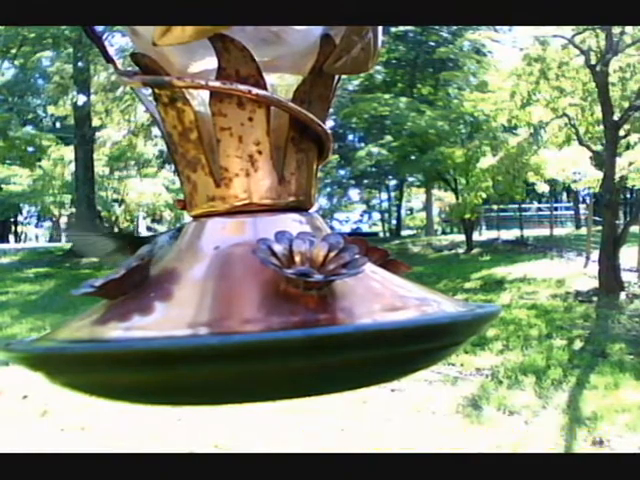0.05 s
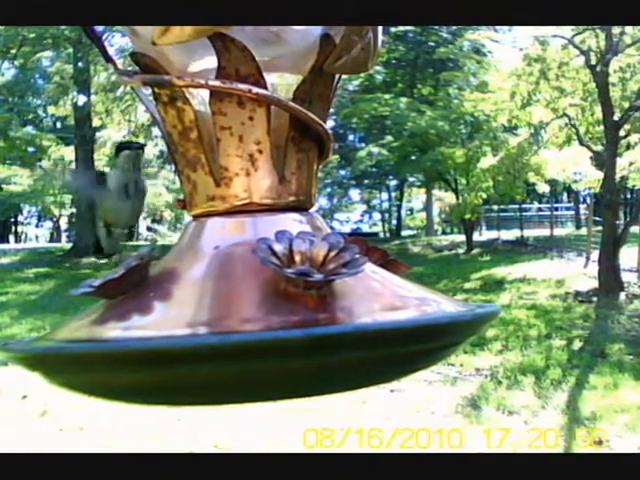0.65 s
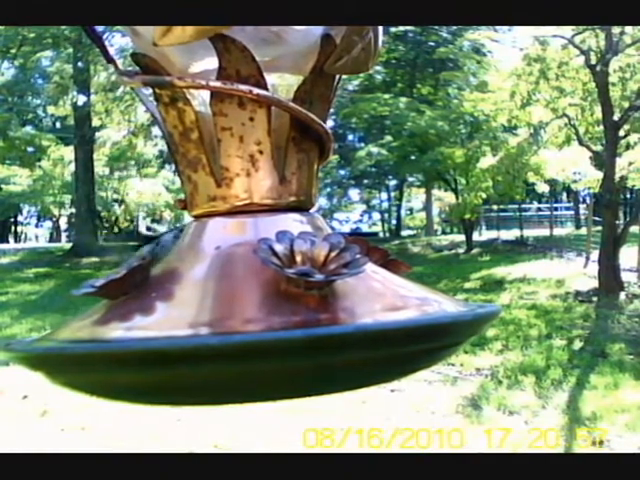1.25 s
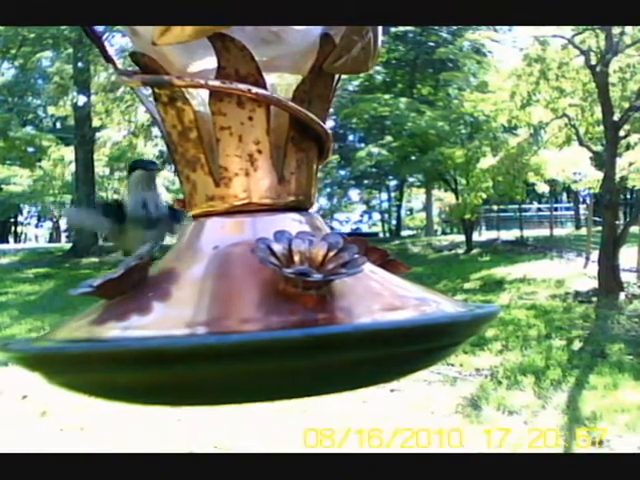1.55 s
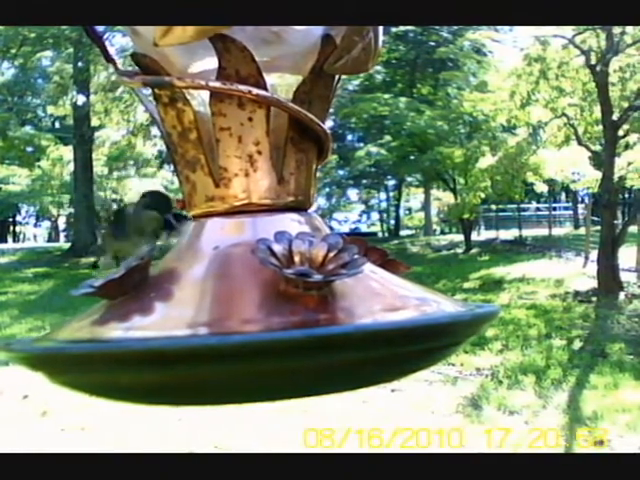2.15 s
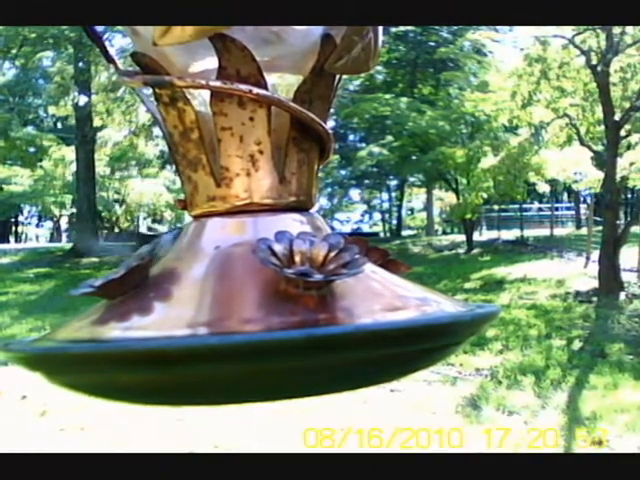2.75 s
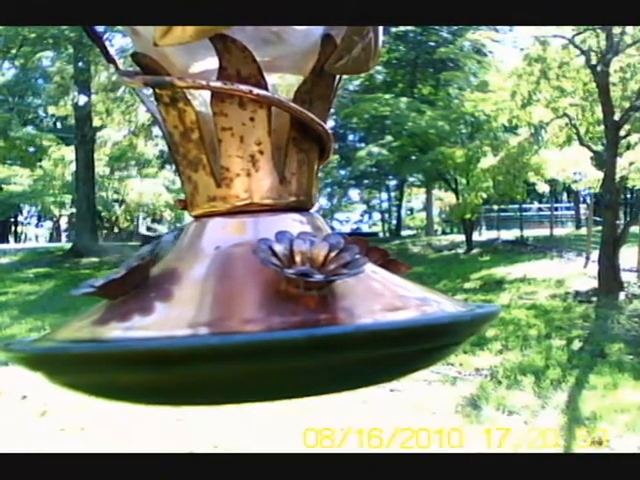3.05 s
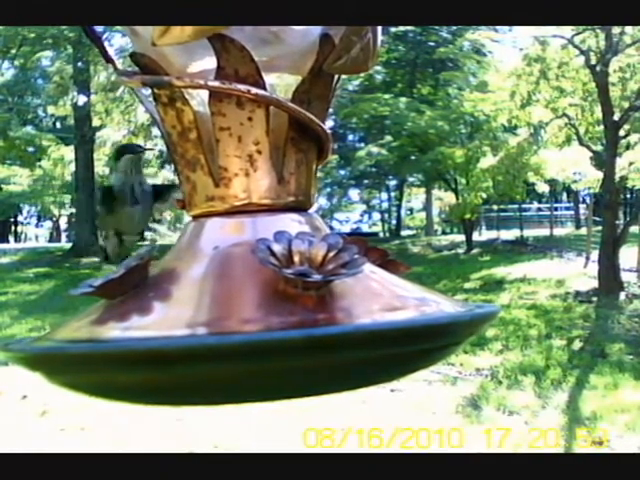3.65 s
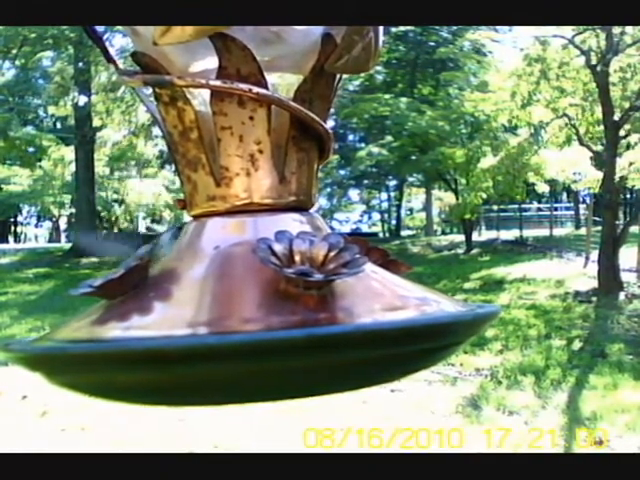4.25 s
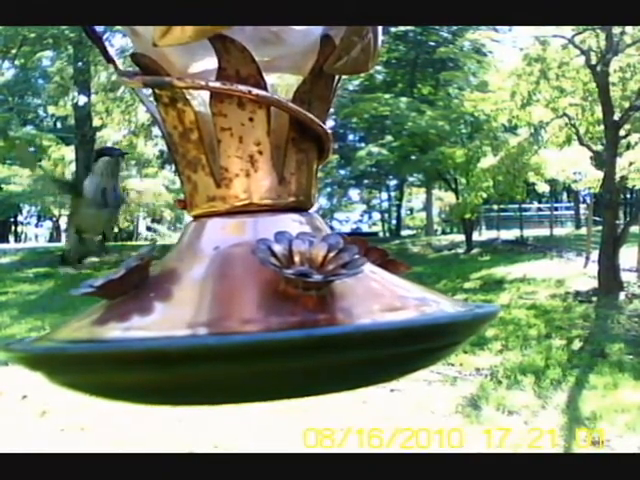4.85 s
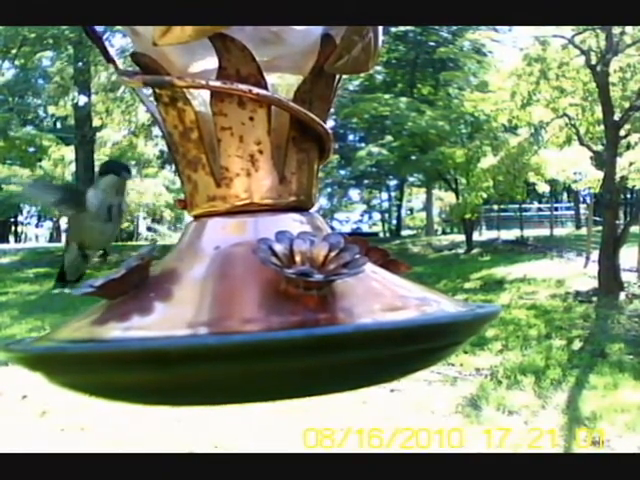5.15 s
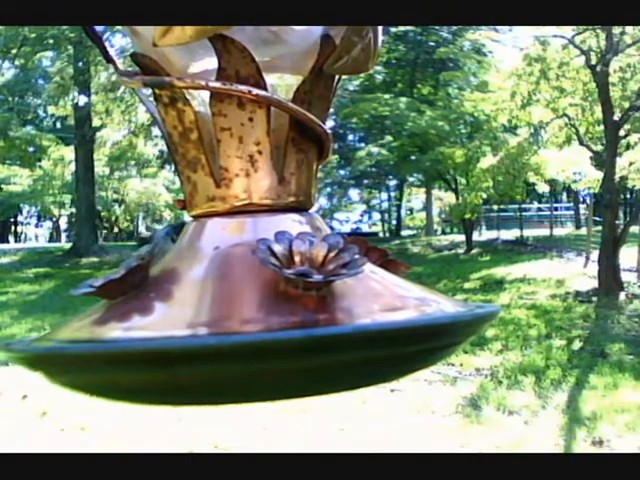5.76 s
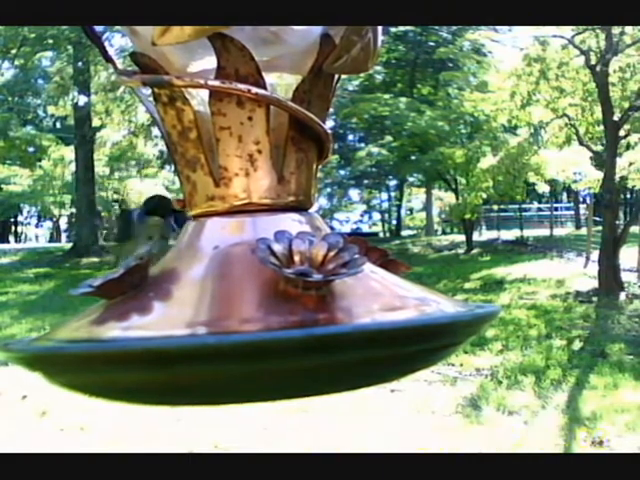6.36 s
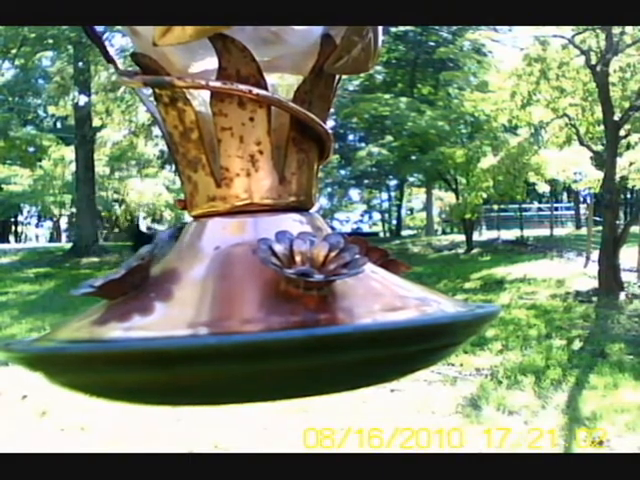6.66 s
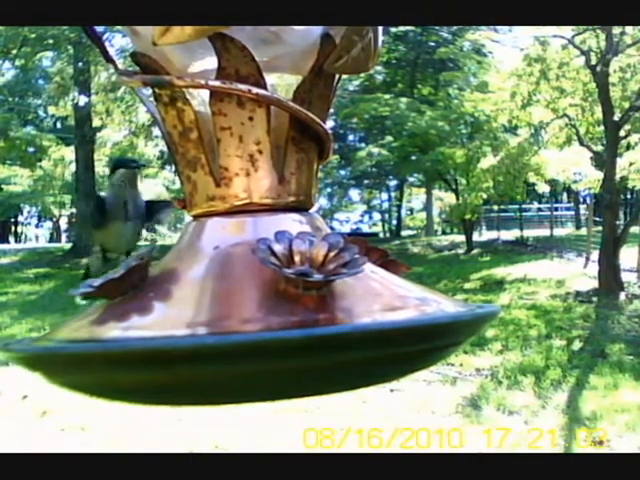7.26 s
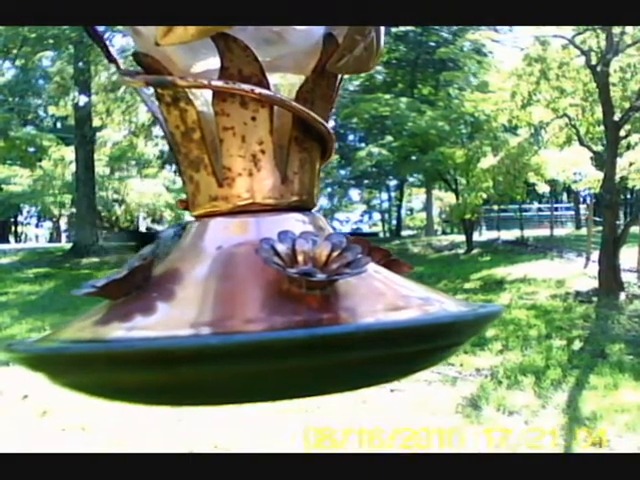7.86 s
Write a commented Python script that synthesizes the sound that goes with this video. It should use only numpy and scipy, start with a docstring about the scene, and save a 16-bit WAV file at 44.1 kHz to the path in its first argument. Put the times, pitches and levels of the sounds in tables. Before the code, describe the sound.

A hummingbird's wings hum low and swell as it darts at a feeder, with light taps over soft outdoor rumble and hiss.

```python
"""A hummingbird hovers at a feeder in a quiet yard, backing out between sips and darting in again.
Its wings throb about fifty times a second, each beat a swell of air, a snap and a feathery swish.
It squeaks twice, and small taps and brushes ring the hollow feeder. Far birds whistle among trees
and an insect's scraped trill creeps in, over a bed of low rumble, soft leaves and the hiss and
whine of a small camera beside the feeder."""
import sys
import numpy as np
from scipy import signal
from scipy.fft import rfft, irfft
from scipy.io import wavfile

SR = 44100
rng = np.random.default_rng(int(sys.argv[2]) if len(sys.argv) > 2 else 0)


def digitize_waveform(pressure):
    """Quantize a signal to 16-bit integers and store it at the path in sys.argv[1].

    Rows of a 2-D input are taken as channels; values are limited to [-1, 1].
    """
    field = np.atleast_2d(pressure).T
    bounded = np.clip(field, -1, 1)
    quanta = np.round(bounded * 32767).astype(np.int16)
    wavfile.write(sys.argv[1], SR, quanta)


N = 348831
TIME = np.arange(N) / SR

# Tone of the wing snap, coloured by the hollow feeder: (frequency [Hz], level [dB])
SNAP_SPECTRUM = [(50, 0.5), (100, -7), (150, -2), (195, -6.5), (245, -3.5), (295, -12), (390, -12.5),
                 (500, -20), (650, -30.5), (1000, -36)]
# The bird backs out with a few hard beats: (time [s], effort above hovering [dB])
RETREAT_BURSTS = [(0.055, 12.5), (1.366, 13), (3.03, 12.5), (4.536, 12.5), (5.683, 13.5), (6.741, 11)]
# It darts in again, more gently: (time [s], effort above hovering [dB], swell time [s])
DART_SWELLS = [(0.739, 7.5, 0.074), (2.17, 6.5, 0.071), (3.99, 6.5, 0.079), (5.17, 6, .06),
               (6.34, 6.5, .09), (7.155, 8, .035), (7.549, 7.5, .06)]
# Its thin squeaks: (time [s], length [s], start pitch [Hz], end pitch [Hz], level [dB])
BIRD_SQUEAKS = [(4.116, 0.02, 7650, 7600, -57), (4.42, .022, 7670, 7650, -52.5)]
# Taps and brushes on the feeder: (time [s], peak level [dB], brightness [Hz], 60 dB decay time [s])
FEEDER_TAPS = [(0.041, -46.5, 2100, 0.19), (0.582, -43, 2400, 0.02), (.764, -43.5, 1500, 0.022),
               (1.124, -44, 3200, .012), (1.846, -42.5, 450, 0.045), (3.601, -43.5, 6000, 0.093),
               (3.625, -46.5, 3500, 0.054), (3.7727, -40, 4400, 0.0097), (4.025, -47, 1800, 0.049),
               (4.044, -41.5, 750, .04), (4.1, -39, 744, 0.016), (4.122, -47, 1000, 0.018),
               (4.174, -42.5, 1699, 0.01), (4.4588, -32, 1660, 0.014), (7.047, -44.5, 6310, 0.022),
               (7.363, -46, 1900, 0.021)]
# The feeder's resonances: (frequency [Hz], width [Hz], relative level [dB])
FEEDER_MODES = [(465, 210, 20.5), (840, 210, 5), (1430, 300, 3.5), (1940, 510, 4), (3480, 1500, -0.5),
                (6040, 1300, -2), (8400, 2200, -5.5)]
# Far birds' whistles: (time [s], length [s], start pitch [Hz], end pitch [Hz], level [dB])
FAR_WHISTLES = [(.14, 0.21, 2400, 2770, -71), (2.42, 0.043, 1850, 1760, -65.5),
                (3.06, .04, 2040, 2070, -68), (3.18, 0.039, 2080, 1990, -64),
                (3.18, 0.079, 2450, 2640, -70), (3.405, 0.047, 2260, 2230, -64),
                (3.46, 0.037, 2010, 2000, -64), (4.07, 0.062, 1880, 1810, -67),
                (6.06, 0.064, 2280, 2525, -64.5), (6.47, .1, 2310, 2652, -65.5),
                (7.645, 0.058, 3020, 3583, -63.5)]
# Fade curve of the insect's trill: (time [s], level [dB])
TRILL_FADE = [(0, -75), (3, -82), (4.3, -73.5), (5.5, -70.5), (7.68, -70), (7.76, -80)]
# The bed of low rumble, a hum near 28 and 56 Hz, and leaves: (frequency [Hz], relative level [dB])
LOW_BED_SPECTRUM = [(3, -45), (10, -5), (19, -4.5), (28, 1.5), (39, -16.5), (56, -9), (80, -15), (150, -20.5),
                    (260, -25.5), (500, -33), (900, -36), (1950, -41.5), (2700, -47.5), (6000, -66.5)]
# Tone of the camera's hiss: (frequency [Hz], relative level [dB])
HISS_SPECTRUM = [(100, -8), (3500, 3), (5000, 2), (7200, 2), (7900, 5), (8600, 1.5), (9500, 2.5),
                 (10300, -2.5), (10800, -11)]
# The camera's steady whine: (frequency [Hz], level [dB])
WHINE_TONES = [(3892, -74), (5599, -80), (7402, -79), (7520, -82), (7790, -80), (9598, -79), (10637, -90)]


def wings(push=2.13, lift_db=-47, swish_db=-17.0, harmonics=17):
    """Each beat pushes a swell of air, then the pressure snaps down as the wings turn over."""
    beat_hz, level_db = flight()
    beats = np.cumsum(beat_hz * (1 + .008 * drift(25))) / SR

    def lobe(at, width):
        """A smooth bump once a beat, placed and sized in fractions of a beat."""
        from_peak = (beats - at + .5) % 1 - .5
        return np.exp(-.5 * (from_peak / width) ** 2)

    swell = push * lobe(at=-.24, width=.1)
    snap = sum(colour(SNAP_SPECTRUM, k * beat_hz) * np.cos(2 * np.pi * k * beats)
               for k in range(1, harmonics + 1))
    feathers = noise([(60, -11), (300, 14), (550, 4.5), (900, -4.5), (2000, -8), (6000, -33)])
    swish = gain_of(swish_db) * feathers * evened(lobe(at=.019, width=.24))  # air rushes at the turn
    throb = swell - swell.mean() - snap + swish
    lift = np.sin(2 * np.pi * (beats + .5))  # the steady work of carrying the bird's weight
    uneven_db = .94 * drift(19)  # no two beats are quite alike
    return gain_of(level_db + uneven_db) * throb + gain_of(lift_db) * lift


def flight(hover_hz=48.14, hz_per_db=.78, sipping_db=-49.5, away_db=-2, travel_s=.084):
    """Wingbeat rate and level: harder beats are faster and louder; hovering farther off is softer."""
    effort_db, away = np.zeros(N), np.zeros(N)
    for s, db, swell_s in DART_SWELLS:
        effort_db += db * surge(s, swell_s)
    for s, db in RETREAT_BURSTS:
        effort_db += db * surge(s, width_s=.035)
        effort_db -= 2.5 * surge(s + .082, width_s=.06)  # the wings ease off afterwards
        next_retreat_s = min((at for at, _ in RETREAT_BURSTS if at > s), default=np.inf)
        # The last dart before the next retreat brings the bird back to the feeder.
        back_s = max(at for at, *_ in DART_SWELLS if at < next_retreat_s)
        away += np.clip(np.minimum(TIME - s, back_s - TIME) / travel_s, 0, 1)
    beat_hz = hover_hz + hz_per_db * effort_db + .3986 * drift(4.88)
    level_db = sipping_db + effort_db + away_db * away + .9 * drift(4.7)
    return beat_hz, level_db


def chirps(notes, waver):
    """Bird calls: near-pure notes that glide and waver in pitch."""
    out, wobble = np.zeros(N), 1 + waver * drift(250)
    for s, length_s, start_hz, end_hz, db in notes:
        count = int(length_s * SR)
        hz = np.linspace(start_hz, end_hz, count) * wobble[int(s * SR):][:count]
        tone = np.sqrt(2) * np.sin(2 * np.pi * np.cumsum(hz) / SR)
        add(out, s, gain_of(db) * tone * signal.windows.tukey(count, .7))
    return out


def feeder_taps():
    """A short scratchy contact rings the feeder; the modes nearest each tap's brightness ring most."""
    out, t = np.zeros(N), np.arange(4000) / SR
    for s, db, bright_hz, t60 in FEEDER_TAPS:
        contact = rng.standard_normal(len(t)) * gain_of(-60 * t / t60)
        tap = np.zeros(len(t))
        for k, (hz, width_hz, mode_db) in enumerate(FEEDER_MODES):
            reach_db = -4.5 * np.log2(hz / bright_hz) ** 2
            tap += (-1) ** k * gain_of(mode_db + reach_db) * ring(contact, hz, width_hz)
        add(out, s, gain_of(db) * tap / abs(tap).max())
    return out


def among_trees(x, wet_db=-7, t60=.53):
    """Trunks and leaves scatter a faint reverb tail behind the dry sound."""
    t = np.arange(SR // 2) / SR
    tail = rng.standard_normal(len(t)) * gain_of(-60 * t / t60)
    return x + gain_of(wet_db) * signal.fftconvolve(x, tail / np.linalg.norm(tail))[:N]


def insect(pitch_hz=8290, waver=.0094):
    """Each wing stroke scrapes out one short, high, wavering note."""
    level_db = np.interp(TIME, *np.transpose(TRILL_FADE))
    strokes_per_s = 29.8 * (1 + .008 * drift(3))
    strokes = (.5 + .5 * np.cos(2 * np.pi * np.cumsum(strokes_per_s) / SR)) ** 2
    hz = pitch_hz * (1 + waver * drift(187))
    tone = np.sin(2 * np.pi * np.cumsum(hz) / SR)
    return gain_of(level_db + 2.4 * drift(19)) * evened(strokes * tone)


def low_bed(level_db=-41):
    """A bed of low rumble with a faint hum near 28 and 56 Hz, and a soft, steady wash of leaves."""
    return noise(LOW_BED_SPECTRUM) * gain_of(level_db)


def electronics(hiss_db=-59, fuzzy_db=-76):
    """The camera's noise floor: even hiss with thin steady tones and one fuzzy one."""
    whine = sum(gain_of(db) * np.sqrt(2) * np.sin(2 * np.pi * (hz * TIME + rng.random()))
                for hz, db in WHINE_TONES)
    fuzzy = evened(ring(rng.standard_normal(N), hz=6915, width_hz=70))
    return gain_of(hiss_db) * noise(HISS_SPECTRUM) + whine + gain_of(fuzzy_db) * fuzzy


def gain_of(db):
    """Decibels to gain."""
    return 10 ** (np.asarray(db) / 20)


def evened(x):
    """Scales to rms 1."""
    return x / np.sqrt(np.mean(x ** 2) + 1e-20)


def add(mix, s, sound):
    """Mixes a sound in at time s."""
    part = mix[max(round(s * SR), 0):][:len(sound)]
    part += sound[:len(part)]


def colour(points, hz):
    """The gain at hz of an EQ curve of (frequency [Hz], level [dB]) points."""
    point_hz, db = np.transpose(points)
    return gain_of(np.interp(np.log(hz + 1), np.log(point_hz), db))


def noise(points):
    """Noise of rms 1, shaped by an EQ curve."""
    eq = colour(points, np.fft.rfftfreq(N, 1 / SR))
    return evened(irfft(rfft(rng.standard_normal(N)) * eq, N))


def drift(hz):
    """Smooth random modulation of rms 1, changing about hz times a second."""
    roll_off = np.exp(-(np.fft.rfftfreq(N, 1 / SR) / hz) ** 2)
    return evened(irfft(rfft(rng.standard_normal(N)) * roll_off, N))


def surge(s, width_s):
    """A smooth swell of height 1 that peaks at time s."""
    return np.exp(-((TIME - s) / width_s) ** 2)


def ring(x, hz, width_hz):
    """Two matching resonators in series, with a gain near 1 at hz."""
    radius = np.exp(-np.pi * width_hz / SR)
    pole = radius * np.exp(2j * np.pi * hz / SR)
    for _ in range(2):
        x = 2 * signal.lfilter([1 - radius], [1, -pole], x).real
    return x


def scene():
    """The hummingbird up front, the yard behind it, in mono."""
    near = wings() + feeder_taps() + chirps(BIRD_SQUEAKS, waver=.013)
    far = low_bed() + among_trees(chirps(FAR_WHISTLES, waver=.006)) + insect()
    return (near + far)[None]


def record(dry):
    """The camera adds its noise floor and a DC offset, and cuts the top end."""
    cutoff_hz, dc_offset = 10980, -.0138
    low_pass = signal.firwin(301, cutoff_hz, window=("kaiser", 8), fs=SR)
    return signal.oaconvolve(dry + electronics(), low_pass[None], "same") + dc_offset


dry = scene()
out = record(dry)
digitize_waveform(out)
```